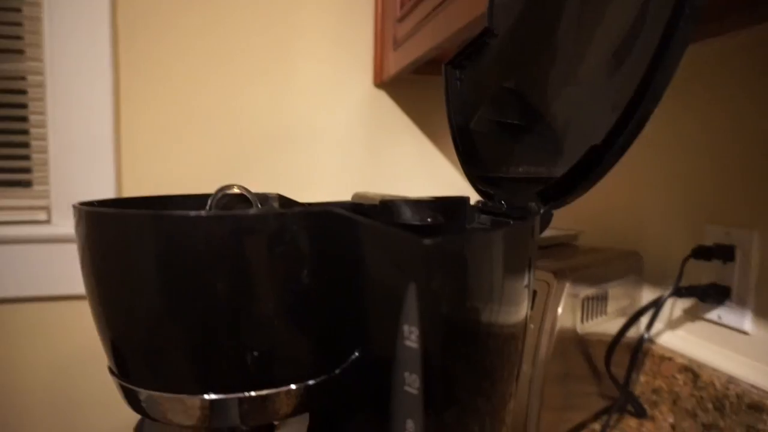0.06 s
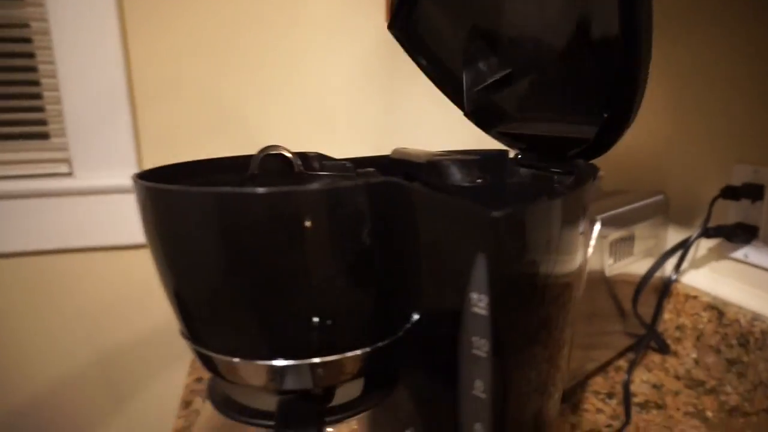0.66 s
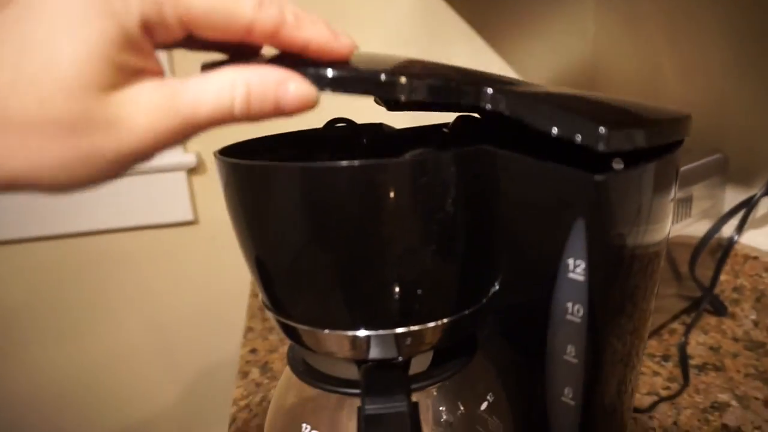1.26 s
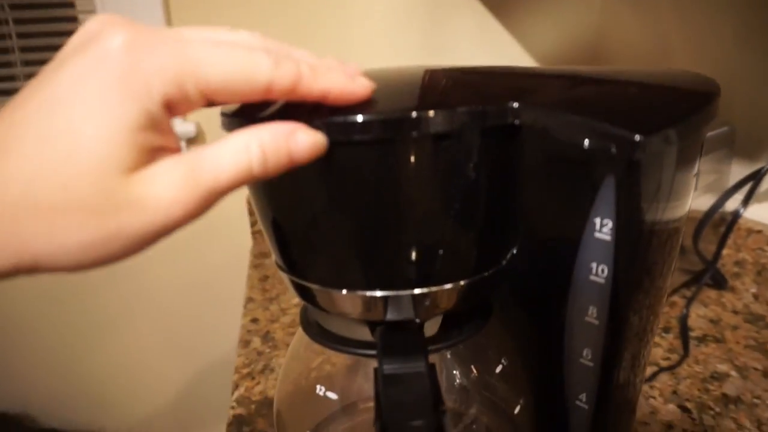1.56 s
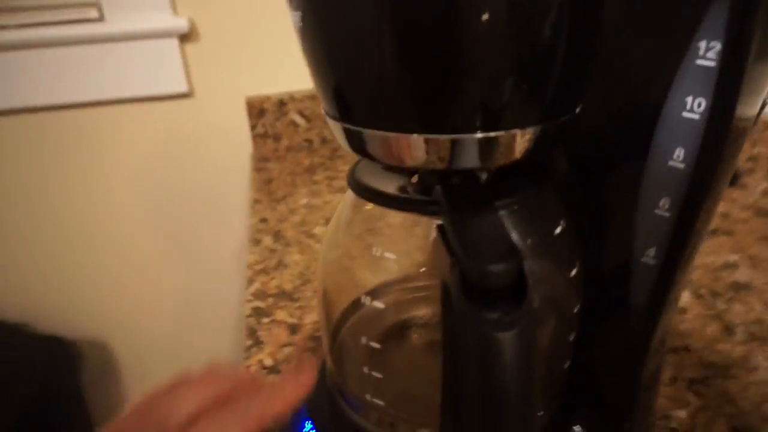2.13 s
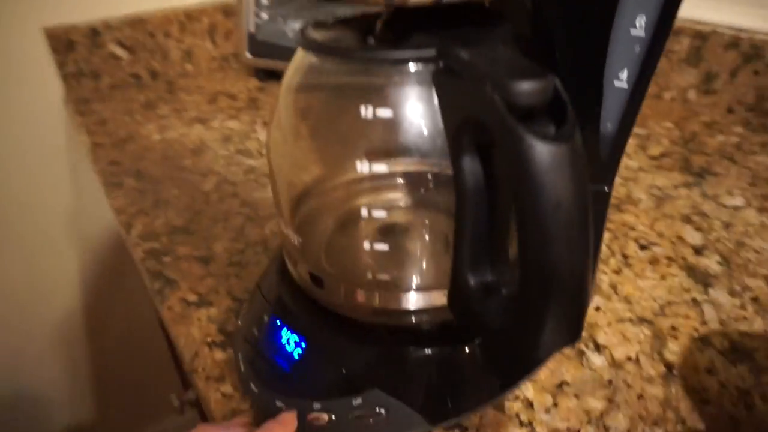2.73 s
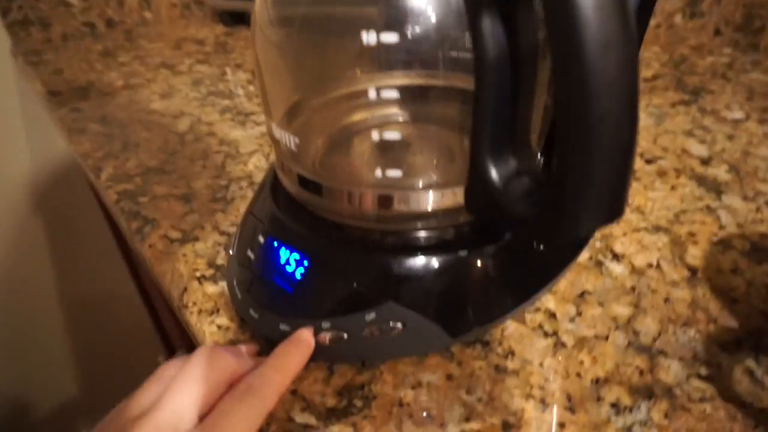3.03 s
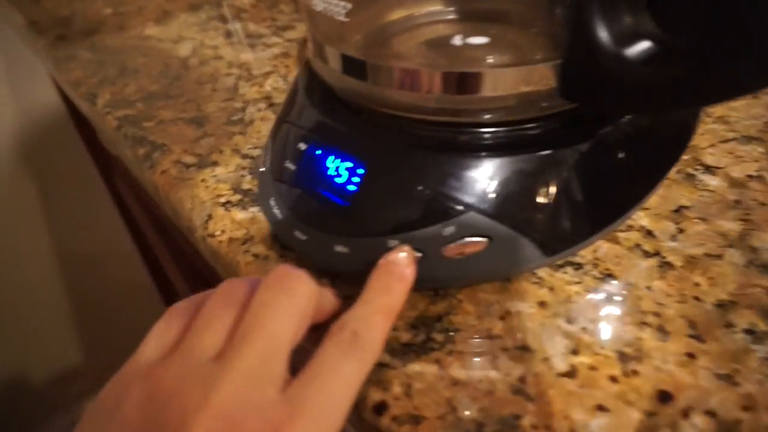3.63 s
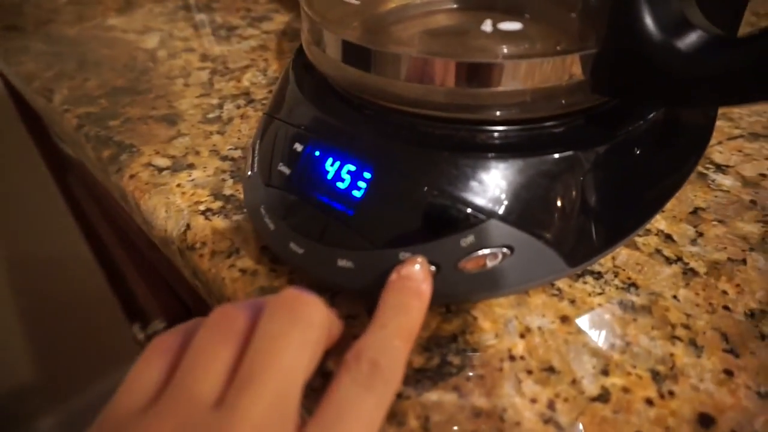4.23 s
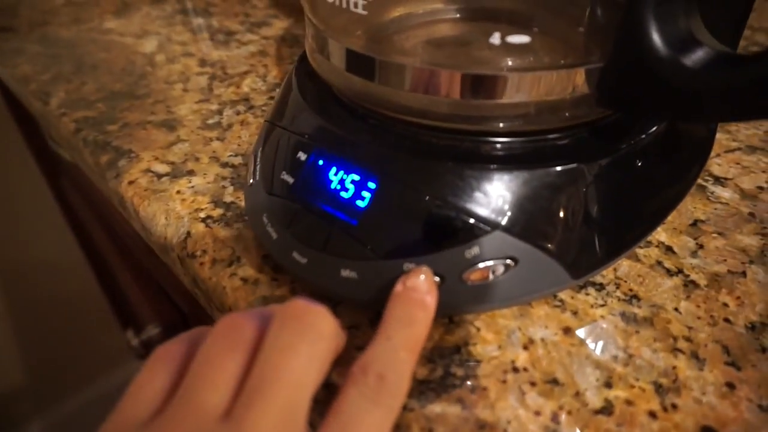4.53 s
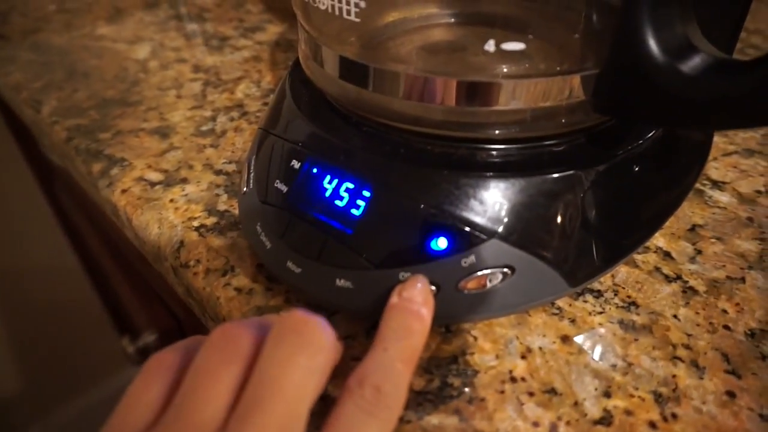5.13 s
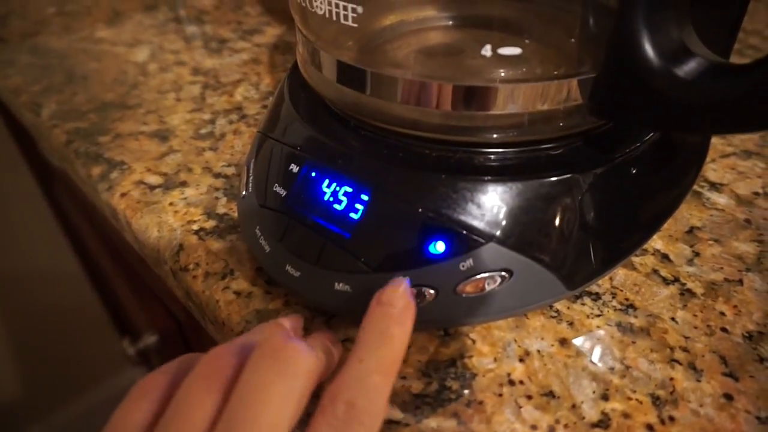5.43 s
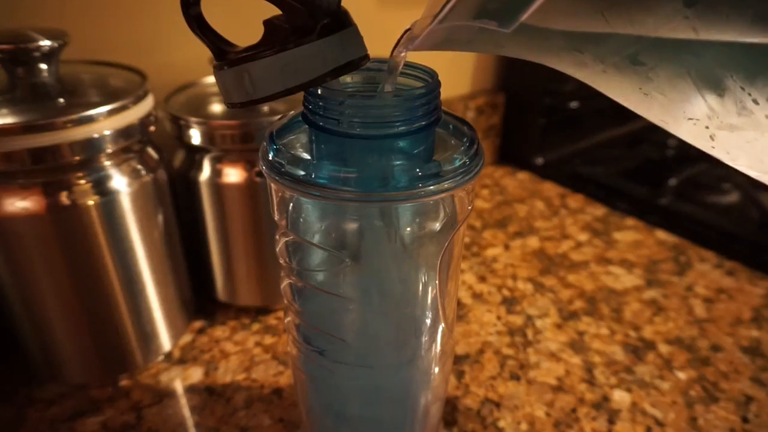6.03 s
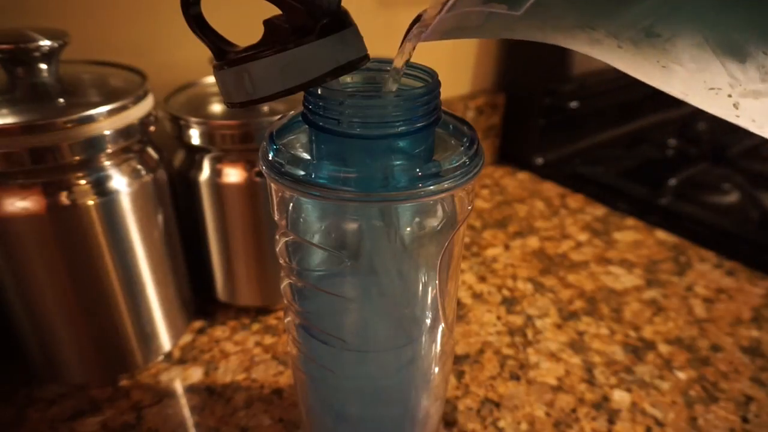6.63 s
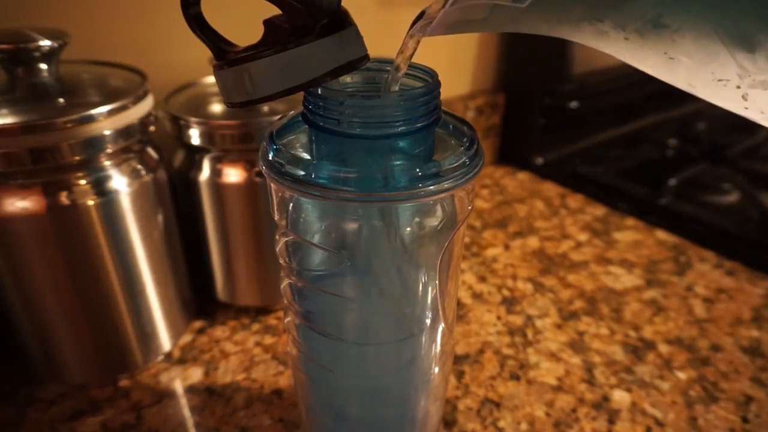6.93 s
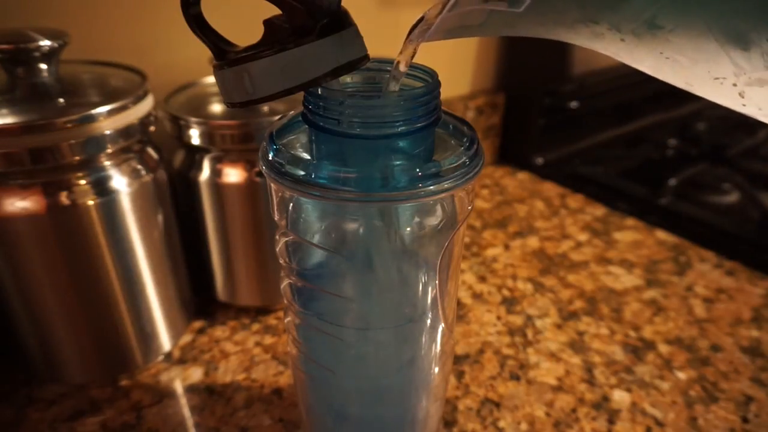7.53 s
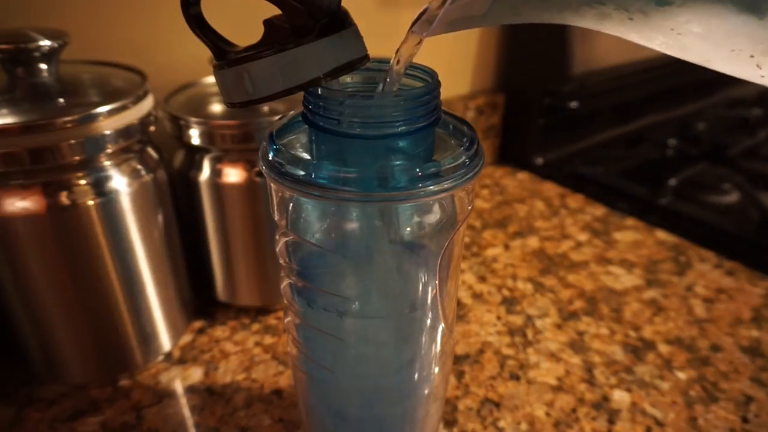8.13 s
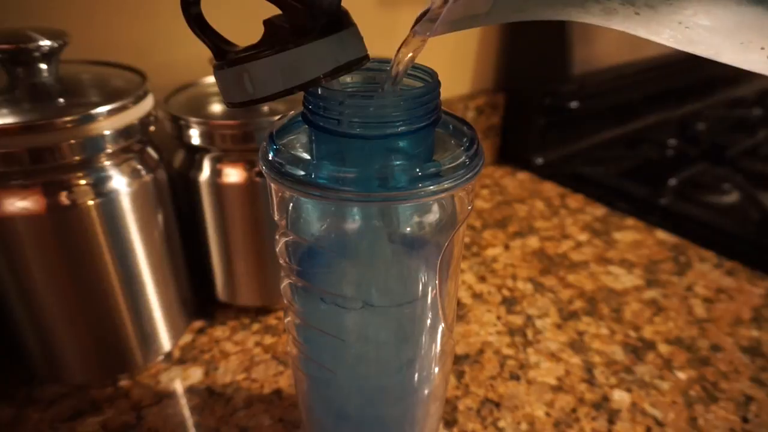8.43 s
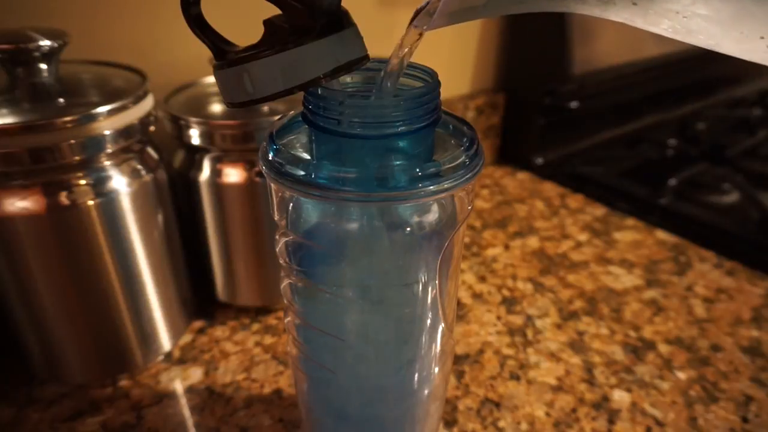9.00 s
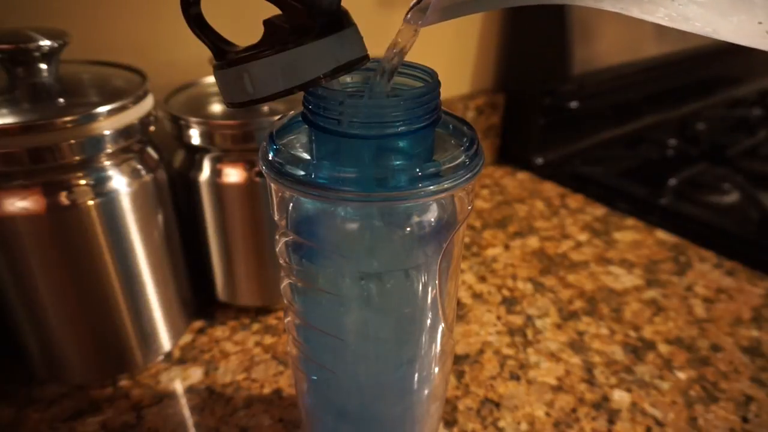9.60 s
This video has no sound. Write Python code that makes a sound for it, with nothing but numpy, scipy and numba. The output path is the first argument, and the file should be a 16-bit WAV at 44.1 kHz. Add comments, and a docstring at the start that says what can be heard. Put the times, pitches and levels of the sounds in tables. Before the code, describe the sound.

In a quiet home kitchen, a last bit of water splashes into a coffee maker. Its plastic lid rubs on a stiff hinge and shuts with hollow knocks. Dry handling crackles sound right at the microphone, then the power switch clicks. Water from a jug then pours into a plastic tumbler close by, spraying and bubbling, with deeper gulps as the pitch rises. An appliance hums faintly behind it all.

```python
"""Water from a jug fills a plastic tumbler close to the microphone in a home kitchen: drops spray, bubbles
ring, and the shrinking air space above the water rises in pitch. Before the pour, a mug's last water
splashes into a coffee maker on the counter, its plastic lid slips down on a stiff hinge and shuts,
handling noise crackles right at the microphone, and the power switch snaps.
An appliance hums faintly behind it all."""
import sys
import numpy as np
from scipy import signal
from scipy.fft import rfft, irfft, next_fast_len
from scipy.io import wavfile
from scipy.ndimage import uniform_filter1d
from numba import njit

SR = 44100
rng = np.random.default_rng(int(sys.argv[2]) if len(sys.argv) > 2 else 0)


def materialize(psi):
    """Save the field psi as 16-bit PCM at rate SR to the path in sys.argv[1].

    A 1-D psi becomes a single channel; in a 2-D psi each row is a channel.
    """
    bounded = np.clip(np.atleast_2d(psi).T, -1, 1)
    quanta = np.round(bounded * 32767).astype(np.int16)
    wavfile.write(sys.argv[1], SR, quanta)


N = 434826
TIME = np.arange(N) / SR


def undb(db):
    """Decibels to gain."""
    return 10 ** (np.asarray(db) / 20)


def curve(points, s):
    """Value at s seconds of a line through (seconds, value) points."""
    return np.interp(s, *np.transpose(points))


def unit(x):
    """Scale to rms 1."""
    return x / np.sqrt(np.mean(x ** 2) + 1e-20)


def blow(x):
    """Scale a transient to the energy of 5 ms at rms 1."""
    return x * np.sqrt(.005 * SR / np.mean(np.sum(x ** 2, axis=-1)))


def fade(t60, n):
    """Exponential decay by 60 dB in t60 seconds."""
    return np.exp(-np.log(1000) * np.arange(n) / SR / max(t60, 1e-3))


def add(out, s, x):
    """Mix x into out at s seconds."""
    i = max(int(s * SR), 0)
    out[..., i:i + x.shape[-1]] += x[..., :max(N - i, 0)]


def highpass(x, hz, order):
    """Roll off the bass below hz."""
    return signal.sosfilt(signal.butter(order, hz, "highpass", fs=SR, output="sos"), x)


def colour(x, spectrum):
    """Filter by (Hz, dB) points, falling steeply beyond both ends."""
    hz, db = np.transpose(spectrum)
    n = next_fast_len(x.shape[-1])
    f = np.fft.rfftfreq(n, 1 / SR) + 1
    gain = undb(np.interp(np.log(f), np.log(hz), db))
    skirts = np.minimum(f / hz[0], 1) ** 2 * np.minimum(hz[-1] / f, 1) ** 4
    return irfft(rfft(x, n) * gain * skirts, n)[..., :x.shape[-1]]


def even(x, span_s):
    """Hold the slow level at 1 and keep the fast grain."""
    power = np.mean(np.atleast_2d(x) ** 2, axis=0)
    size = max(int(span_s * SR / 2), 2)
    power = uniform_filter1d(uniform_filter1d(power, size), size)
    return x / np.sqrt(np.abs(power) + 1e-3 * power.mean())


def wander(per_s):
    """A slow random curve with a spread near 1."""
    knots = np.arange(0, N / SR + 1, 1 / per_s)
    return 1.2 * np.interp(TIME, knots, rng.standard_normal(len(knots)))


def follow(db, law):
    """Level of one part of a hit of strength db; law is (dB at a strength of -20.5 dB, dB per dB)."""
    return law[0] + law[1] * (db + 20.5)


def air(n):
    """Diffuse noise at the microphone's two close ports: alike in the bass, less so higher up."""
    mid, side = rng.standard_normal((2, n))
    side = colour(side, [(100, -25), (400, -7.5), (1000, -5.5), (2200, 0), (5000, -2), (12000, -6),
                         (20000, -12.5)])
    return np.array([mid + side, mid - side])


def burst(spectrum, t60, n):
    """Dense, quickly dying resonances; the contact takes half a millisecond to build."""
    return blow(colour(air(n), spectrum) * fade(t60, n) * (1 - fade(0.0037, n)))


def ring(modes, n, stretch=1):
    """Struck (Hz, dB, t60 s) modes, a little different at every blow; stretch scales their decay times."""
    t, out = np.arange(n) / SR, np.zeros(n)
    for hz, db, t60 in modes:
        strength, detune = rng.standard_normal(2)
        tone = np.sign(detune) * np.sin(2 * np.pi * hz * (1 + 0.0033 * detune) * t)
        out += undb(db + 2 * strength) * tone * fade(t60 * stretch, n)
    return blow(out)


def bubble(hz, cycles, glide, onset=1):
    """A pocket of air rings for some cycles, its pitch rising as it nears the surface."""
    age = np.arange(int(cycles * SR / hz) + 2) * hz / SR  # in cycles
    tone = np.sin(2 * np.pi * age * (1 + glide * age / cycles / 2))
    return tone * np.exp(-np.log(300) * age / cycles) * (1 - np.exp(-age / onset))


def swarm(start, end, per_s, lo_hz, hi_hz, cycles, spread_db):
    """Random bubbles: many faint ones, a few loud."""
    out = np.zeros(N)
    for when, pitch, size, life in rng.random((int(per_s * (end - start)), 4)):
        gain = undb(spread_db * min(-np.log(1 - size), 4))
        hz = lo_hz * (hi_hz / lo_hz) ** pitch
        add(out, start + when * (end - start), gain * bubble(hz, cycles * (.5 + life), glide=0.035))
    return out


def clicks(start, end, per_s, spread_db):
    """Bare impulses of unequal size at random times."""
    out = np.zeros(N)
    when, size, sign = rng.random((int(per_s * (end - start)), 3)).T
    at = np.clip((start + when * (end - start)) * SR, 0, N - 1).astype(int)
    out[at] = np.sign(sign - .5) * undb(spread_db * np.minimum(-np.log(1 - size), 4))
    return out


@njit
def resonate(x, hz, width_hz):
    """Band-pass whose centre and width move."""
    out, band_state, low_state = np.empty(len(x)), 0., 0.
    for i in range(len(x)):
        g, damping = np.tan(np.pi * hz[i] / SR), width_hz[i] / hz[i]
        band = (band_state + g * (x[i] + 1e-18 - low_state)) / (1 + g * (g + damping))
        band_state = 2 * band - band_state
        low_state += 2 * g * band
        out[i] = damping * band
    return out


# The kitchen's reverberation, heard at the counter. Each row: frequency in Hz, level in dB.
ROOM_COLOUR = [(100, -6.5), (300, 2), (1100, -0.5), (3000, 2.5), (8000, 0), (16000, -14)]
ROOM_T60_S, TREBLE_T60_S = 0.44, 0.49
def room(x, near_db, wet_db):
    """Direct sound, quick reflections from counter and wall, then the kitchen's tail."""
    n = SR // 2
    noise = colour(air(n), ROOM_COLOUR)
    low = signal.sosfilt(signal.butter(1, 2500, fs=SR, output="sos"), noise)
    tail = (low * fade(ROOM_T60_S, n) + (noise - low) * fade(TREBLE_T60_S, n)) * (1 - fade(0.015, n))
    near = air(n) * fade(0.034, n) * (1 - fade(0.0039, n))
    response = sum(undb(db) * r / np.sqrt(np.sum(r ** 2) / 2)
                   for r, db in ((near, near_db), (tail, wet_db)))
    return x + signal.fftconvolve(np.atleast_2d(x), response, axes=-1)[:, :x.shape[-1]]


# Room tone and hiss, all around the microphone. Each row: frequency in Hz, level in dB.
ROOM_TONE = [(40, -20.5), (150, -15.5), (330, -8), (550, -4), (800, -7), (1400, 1), (1800, -7),
             (2150, -0.5), (2900, -10), (6500, -12.5), (8000, -7.5), (10000, -16)]
HISS = [(9000, -25), (11500, -9), (13500, -13), (15000, -3), (16000, -19)]
def room_tone():
    """The kitchen's still air, with a thin hiss on top."""
    return undb(-60) * unit(colour(air(N), ROOM_TONE)) + undb(-65) * unit(colour(air(N), HISS))


# An appliance in the background, heard from three spots. Each row: frequency in Hz, then rms level in dB
# with the microphone beside the lid, on the way, and down by the switch.
HUM_LINES = [(2035, -86.5, -74, -65.5), (2154, -64.5, -75, -69), (14940, -74.5, -85, -70),
             (15061, -72, -79, -73)]
MIC_AT_SPOT_S = (2.6, 2.5, 5.1)
def appliance_hum():
    """Thin, slightly wavering tones whose levels depend on where the microphone is."""
    out, knots = np.zeros((2, N)), np.linspace(0, N / SR, 50)
    for hz, *spots_db in HUM_LINES:
        db = np.interp(TIME, MIC_AT_SPOT_S, spots_db)
        for channel in out:
            drift, sway = (np.interp(TIME, knots, k) for k in rng.standard_normal((2, len(knots))))
            channel += np.sqrt(2) * undb(db + 0.8 * sway) * np.sin(2 * np.pi * hz * TIME + 0.7 * drift)
    return out


def whirr(start=2.97, end=3.7, edge_s=0.047, hz=490, width_hz=113):
    """A faint, narrow band of noise comes and goes, perhaps a lens focusing."""
    running = np.clip(np.minimum(TIME - start, end - TIME) / edge_s, 0, 1)
    band = [(hz - width_hz, -18), (hz, 0), (hz + width_hz, -14)]
    return undb(-64) * unit(colour(air(N), band)) * running


# The ring of a crackle at the microphone. Each row: frequency in Hz, level in dB, t60 in seconds.
CRACKLE_MODES = [(1336, -2.5, 0.049), (2440, 0, 0.07), (3000, 6.5, 0.015)]
# Its body and its bright edge. Each row: frequency in Hz, level in dB.
CRACKLE_BODY = [(1100, -12), (1350, -6.5), (1900, -15), (2600, 18), (3400, -1.5), (5000, -6)]
CRACKLE_TOP = [(3500, -12.5), (5400, -3.5), (7500, -1.5), (10000, -15.5), (12000, -10), (16000, -29)]
GRIT_DB, GRIT_T60_S, RIGHT_PORT_LAG_S = -20, 0.15, 0.00021
def crackle(db):
    """A tiny double snap, mostly left: the contact sticks once more, lets go, and loose grains rattle."""
    out, n = np.zeros((2, SR // 10)), SR // 12
    pan_db = 3.4 + 1.5 * rng.standard_normal()
    for delay, share_db in ((0, -1.5), (rng.uniform(0.0012, 0.0039), -5)):
        shift = np.exp(0.081 * rng.standard_normal())  # each snap lets go at another spot
        modes = [(hz * shift ** .25, level, t60) for hz, level, t60 in CRACKLE_MODES]
        body = undb(-16) * np.array([ring(modes, n), ring(modes, n)]) * (1 - fade(0.0017, n))
        body += undb(-10.5) * burst([(hz * shift, level) for hz, level in CRACKLE_BODY], 0.0085, n)
        edge = undb(follow(db, (-38, 1.42))) * burst(CRACKLE_TOP, 0.0057, n)  # harder is brighter
        add(out, delay, undb(share_db) * (undb(db) * body + edge))
    grains = rng.standard_normal(n) ** 5 * fade(GRIT_T60_S, n)
    grit = colour(grains, [(1200, -5), (2800, 8.5), (6000, -14), (12000, -22.5)])
    add(out, 0, undb(db + GRIT_DB) * blow(grit))
    out = highpass(out, 950, order=3)
    out[1] = np.roll(out[1], int(RIGHT_PORT_LAG_S * SR))
    return out * undb([[pan_db / 2], [-pan_db / 2]])


# Dry crackles and dull bumps on the body that holds the microphone. Each row: start in seconds, level in dB.
CRACKLES = [(0.273, -21.5), (0.29, -26.5), (0.813, -24), (2.174, -12), (2.178, -7), (2.2306, -19),
            (2.2868, -13.5), (2.301, -16), (2.317, -31), (2.368, -28.5), (2.4021, -13), (2.449, -21.5),
            (2.465, -19.5), (2.4826, -12.5), (2.5124, -14.5), (2.574, -26), (2.6323, -21), (2.678, -17),
            (2.6939, -14.5), (2.723, -23), (2.761, -20.5), (2.804, -17.5), (2.8418, -25.5), (2.888, -20),
            (2.91, -25.5), (3.113, -30.5), (3.2297, -17), (3.3016, -23), (3.319, -28.5), (3.3916, -32)]
BUMPS = [(2.177, -14.5), (2.198, -28.5), (2.217, -26)]
# The tone of a bump. Each row: frequency in Hz, level in dB.
BUMP_COLOUR = [(120, -25), (260, 12), (450, 7), (700, 8), (1100, 9.5), (1600, 8.5)]
def handling_noise():
    """Snaps and bumps so near the microphone that the room hardly answers."""
    out = np.zeros((2, N))
    for s, db in CRACKLES:
        add(out, s, crackle(db))
    for s, db in BUMPS:
        add(out, s, undb(db) * burst(BUMP_COLOUR, 0.045, SR // 12))
    return room(out, near_db=-22, wet_db=-30)


# Press, latch and release, with the microphone down by the coffee maker's base.
# Each row: start in seconds, then the levels of body, button and snap in dB.
SWITCH_CLICKS = [(5.101, -26, -25, -29.5), (5.137, -29.5, -25.5, -24.5), (5.283, -19.5, -30.5, -32),
                 (5.3038, -33, -36, -40)]
# The tones of those three parts. Each row: frequency in Hz, level in dB.
SWITCH_BODY = [(330, -23.5), (600, -15), (750, -3.5), (1150, 0.5), (1400, 2.5), (1750, -8), (2000, -15)]
SWITCH_BUTTON = [(1700, -4), (2350, 8), (2700, -4.5), (3500, -12)]
SWITCH_SNAP = [(1760, -41), (3000, -14), (4930, 2), (5750, -9.5), (6760, 0.5), (7830, -8), (9330, 2.5),
               (10400, -23), (11500, -6), (16000, -21)]
# Soft fingertip bumps on the base. Each row: start in seconds, level in dB.
FINGER_BUMPS = [(3.178, -53.5), (5.019, -51.5), (5.217, -44.5), (5.355, -46)]
SPRING_S, SPRING_DB, SPRING_T60_S = 5.138, -19.5, 0.17
def power_switch():
    """A fingertip lands, button and latch snap in the plastic base, and the latch's spring sings on."""
    out, n = np.zeros((2, N)), SR // 4
    for s, body_db, button_db, snap_db in SWITCH_CLICKS:
        add(out, s, undb(body_db) * burst(SWITCH_BODY, 0.057, n))
        add(out, s, undb(button_db) * burst(SWITCH_BUTTON, 0.01, n))
        add(out, s, undb(snap_db) * burst(SWITCH_SNAP, 0.011, n))
    spring = [(6000, -14), (7000, -1), (10000, -4), (11500, 6), (14000, -1), (16000, -3)]
    add(out, SPRING_S, undb(SPRING_DB) * burst(spring, SPRING_T60_S, n))
    for s, db in FINGER_BUMPS:
        add(out, s, undb(db) * burst([(300, -11.5), (390, 2.5), (500, -12.5)], 0.25, n))
    return room(out, near_db=-1.5, wet_db=-3.5)


# The lid's hinge rubbing, near the microphone. Each row: start and end in seconds, level in dB.
RUBS = [(0.158, 0.277, -51.5), (0.526, 0.674, -41), (1.1, 1.28, -35.5), (1.362, 1.57, -37)]
# The tone of the rub. Each row: frequency in Hz, level in dB.
RUB_COLOUR = [(130, -32.5), (250, -11), (360, -1), (520, -5.5), (750, -16.5), (1300, -18.5), (2200, -30)]
def hinge_rub(edge_s=0.02):
    """Dense tiny catches of the hinge, heard through the hollow housing."""
    catches = room(clicks(0, N / SR, per_s=200, spread_db=0.5), near_db=-1, wet_db=-10.5)
    level = sum(undb(db) * np.clip(np.minimum(TIME - start, end - TIME) / edge_s, 0, 1)
                for start, end, db in RUBS)
    return even(colour(catches, RUB_COLOUR), 0.0494) * level


# The coffee maker's housing and panels. Each row: frequency in Hz, level in dB, unstretched t60 in seconds.
HOUSING_MODES = [(216.8, -7, 0.26), (256, -4, 0.25), (322, -0.5, .24), (415.8, -8, 0.28), (543, 4.5, 0.36),
                 (605, -7.5, 0.31), (739, -8.5, 0.2), (842, -2, 0.25), (881, -7, .3), (1053, 3.5, 0.53),
                 (1130, -11, .25), (1255, -8, .3)]
# The tones of a knock's thud, panels and edge. Each row: frequency in Hz, level in dB.
THUD_COLOUR = [(80, -44), (170, -24.5), (290, -8), (394, -0.5), (516, -6), (668, -16.5), (896, -17),
               (1190, -17.5), (1500, -25.5), (1950, -51)]
PANEL_COLOUR = [(500, -21), (650, 5.5), (850, 3.5), (1100, 5), (1400, -8.5), (2000, -18)]
TICK_COLOUR = [(880, -33), (1500, -2), (2440, -8), (2690, -5.5), (3090, -17), (5490, -23), (12600, -30.5),
               (16000, -20.5)]
def knock(db, ring_db, panel_law, tick_law):
    """One knock on the coffee maker: the hollow housing thuds, its panels ring, the edges tick."""
    n = SR // 4
    hollow_modes = [mode for mode in HOUSING_MODES if mode[0] < 750]
    panel_modes = [mode for mode in HOUSING_MODES if mode[0] >= 750]
    thud = undb(-7) * burst(THUD_COLOUR, 0.025, n) + undb(ring_db) * ring(hollow_modes, n, stretch=0.6)
    thud *= 1 - fade(0.012, n)
    panel = undb(-3.5) * burst(PANEL_COLOUR, 0.03, n) + undb(-8) * ring(panel_modes, n, stretch=0.45)
    tick = burst(TICK_COLOUR, 0.05, n)
    hit = undb(db) * thud + undb(follow(db, panel_law)) * panel + undb(follow(db, tick_law)) * tick
    return highpass(hit, 120, order=2)


# Hinge slips and landings, with the microphone beside the lid. Each row: start in seconds, thud level in dB.
SLIPS = [(0.598, -26.5), (1.085, -16), (1.124, -17), (1.176, -10.5), (1.389, -13), (1.471, -14.5),
         (1.815, -35)]
LANDINGS = [(1.553, -5.5), (1.569, -14), (1.608, -16.5), (2.008, -28.5), (2.025, -19.5), (2.035, -20.5)]
RIM_S, RIM_DB = 2.0185, -27  # the rim ticks as the fingers leave it
def lid():
    """The stiff hinge rubs and slips; the lid lands, rings the housing harder, bounces and settles."""
    out = hinge_rub()
    for s, db in SLIPS:
        add(out, s, knock(db, ring_db=-21.5, panel_law=(-39, .6), tick_law=(-44, .65)))
    for s, db in LANDINGS:
        add(out, s, knock(db, ring_db=-7, panel_law=(-20.5, 1.08), tick_law=(-37.5, 1)))
    add(out, RIM_S, undb(RIM_DB) * burst([(6000, -10), (12000, 3), (15000, 7.5)], 0.011, SR // 4))
    return room(out, near_db=-16.5, wet_db=-2.5)


# Slops into the reservoir, heard from beside the open lid.
# Each row: start in seconds, splash level in dB, gulp level in dB, gulp pitch in Hz.
SLOPS = [(0.014, -33, -24, 493), (0.024, -28, -18, 1240), (0.093, -40, -15, 484)]
# The tone of the splash. Each row: frequency in Hz, level in dB.
SPLASH_COLOUR = [(200, -19), (330, -12.5), (480, -2.5), (650, -12.5), (900, -8), (1300, 2), (1900, -9),
                 (3600, -24), (5500, -14.5), (7200, -22.5), (10500, -12.5), (16000, -19)]
MUG_DB, MUG_STOP_S, MUG_RELEASE_S, SLOP_T60_S = -24.5, 0.1016, 0.013, 0.088
def mug_splash():
    """The mug's last water swells with each slop, gulps air and stops abruptly."""
    grains = swarm(0, .13, per_s=3300, lo_hz=325, hi_hz=15600, cycles=4.2, spread_db=4.5)
    water = room(np.diff(grains, prepend=0) + 0.11 * grains, near_db=5, wet_db=-5)
    level, gulp = np.full(N, undb(MUG_DB)), np.zeros(N)
    for s, splash_db, gulp_db, hz in SLOPS:
        add(level, s, undb(splash_db) * fade(SLOP_T60_S, SR // 4))
        add(gulp, s, undb(gulp_db) * blow(bubble(hz, cycles=18, glide=.05, onset=1.8)))
    attack = np.clip(TIME / SLOPS[0][0], .3, 1)
    release = np.clip(1 - (TIME - MUG_STOP_S) / MUG_RELEASE_S, 0, 1) ** 2
    return (even(colour(water, SPLASH_COLOUR), 0.013) * level + gulp) * attack * release


POUR_S, FILL_S = 6.02, 6.48  # start of the pour; time it would take to reach the brim
STREAM_SPAN_S = (POUR_S - .02, N / SR)
POUR_AGE_S = np.maximum(TIME - POUR_S, 0)
PLUNGE_S, PLUNGE_RISE_S = 8.52, 0.13
def plunge(s, before_db, after_db):
    """A level that changes smoothly as the stream begins to drag air deep under."""
    return before_db + (after_db - before_db) * (1 + np.tanh((s - PLUNGE_S) / PLUNGE_RISE_S / 2)) / 2


def low_rumble():
    """A very faint, uneven low rumble during the pour."""
    impulses = clicks(*STREAM_SPAN_S, per_s=200, spread_db=3.5)
    return undb(-54) * even(colour(impulses, [(28, 16), (60, 3), (130, -19), (250, -31)]), 0.25)


EMPTY_HZ, WIDTH_HZ, FROTH_HZ_PER_S = 441.9, 4.6, 3.9
def air_note(s):
    """Pitch and width in Hz of the tumbler's air space: it rings like a bottle, and froth damps it."""
    air_left = np.clip(1 - (s - POUR_S) / FILL_S, .1, 1)
    return EMPTY_HZ / np.sqrt(air_left), WIDTH_HZ + FROTH_HZ_PER_S * np.maximum(s - POUR_S, 0)


def air_ring(s, detune=0):
    """The air space, pushed once: its note swells and dies, sooner as froth builds up."""
    n = SR // 3
    t = np.arange(n) / SR
    hz, width_hz = air_note(s)
    return np.sin(2 * np.pi * hz * (1 + detune) * t) * np.exp(-np.pi * width_hz * t) * (1 - fade(0.022, n))


def air_space():
    """Bubbles keep the shrinking air space above the water ringing, ever higher."""
    stir = swarm(*STREAM_SPAN_S, per_s=400, lo_hz=410, hi_hz=802, cycles=5.8, spread_db=3.5)
    note = resonate(np.diff(stir, prepend=0), *air_note(TIME))
    return even(room(note, near_db=-10, wet_db=-9), 0.1) * undb(plunge(TIME, -50, -35))


# Churning deep in the tumbler, late in the pour. Each row: time in seconds, level in dB.
CHURN_LEVEL = [(8.8, -74), (9.0, -48), (9.25, -43.5), (9.65, -41.5), (9.86, -58)]
# Its tone. Each row: frequency in Hz, level in dB.
CHURN_COLOUR = [(120, -2.5), (230, 4.5), (350, 8)]
def churn():
    """The deepening water turns over with a low rumble."""
    return even(colour(air(N), CHURN_COLOUR), 0.11) * undb(curve(CHURN_LEVEL, TIME))


# Gurgling, heard from outside the tumbler. Each row: frequency in Hz, level in dB.
GURGLE_COLOUR = [(240, -16.5), (380, -14), (560, -10), (850, -2), (980, -9.5), (1120, -2), (1250, -8.5),
                 (1400, -5.5), (1700, -23)]
def gurgle():
    """Low bubbles ring under the stream, louder once it plunges deep."""
    bubbles = swarm(*STREAM_SPAN_S, per_s=300, lo_hz=280, hi_hz=1650, cycles=11, spread_db=4)
    water = room(colour(np.diff(bubbles, prepend=0), GURGLE_COLOUR), near_db=3, wet_db=2)
    return even(water, 0.28) * undb(plunge(TIME, -40, -32.5))


# Fizz in the tumbler. Each row: frequency in Hz, level in dB.
FIZZ_COLOUR = [(820, -18), (1400, -4), (1560, -20.5), (1700, -13), (1830, -3), (1950, -4.5), (2220, -2.5),
               (2620, 0), (3100, -6.5), (3550, -6.5), (3800, 0), (4940, -24), (8360, -120)]
FIZZ_DB, SHALLOW_DB, SHALLOW_S = -34, 5.5, 0.59
def fizz():
    """Small bubbles, loudest while the water is shallow, come in clusters as the stream wobbles."""
    bubbles = swarm(*STREAM_SPAN_S, per_s=280, lo_hz=1450, hi_hz=3400, cycles=28, spread_db=3.8)
    db = FIZZ_DB + SHALLOW_DB * np.exp(-POUR_AGE_S / SHALLOW_S) + 1.97 * wander(per_s=9)
    return even(room(colour(bubbles, FIZZ_COLOUR), near_db=-3, wet_db=-3.5), 1.0) * undb(db)


def smack(hz):
    """One drop: a short wet tick and a dimple that rings around its own pitch."""
    n = SR // 20
    tick = burst([(3000, -8), (8500, 2), (16000, 3)], 0.012, n)
    dimple = burst([(.75 * hz, -20), (hz, 0), (1.25 * hz, -20)], 0.023, n)
    return tick + undb(3) * dimple


def shifting_room(x, near_db, wet_db):
    """Reflections keep changing as the water rises: a new set fades in every quarter second."""
    out, hop = np.zeros((2, N)), SR // 4
    window = np.sin(np.pi * np.arange(2 * hop) / (2 * hop))
    x = np.pad(x, ((0, 0), (0, 2 * hop)))
    for i in range(0, N, hop):
        if i + 2 * hop > POUR_S * SR:
            piece = np.pad(x[:, i:i + 2 * hop] * window, ((0, 0), (0, hop)))
            add(out, i / SR, room(piece, near_db, wet_db))
    return out


def mist():
    """Tiny ringing bubbles and the smacks of droplets of many sizes."""
    bubbles = swarm(*STREAM_SPAN_S, per_s=1400, lo_hz=3300, hi_hz=16000, cycles=36, spread_db=4)
    drops = sum(signal.oaconvolve(clicks(*STREAM_SPAN_S, per_s=40, spread_db=5.5), smack(hz)[0])[:N]
                for hz in np.geomspace(4600, 14000, 12))
    return unit(np.diff(bubbles, prepend=0)) + undb(4) * unit(drops)


# Spray at the tumbler's mouth, close to the microphone. Each row: frequency in Hz, level in dB.
SPRAY_COLOUR = [(1760, 9), (3000, -3), (3310, -0.5), (3570, -8), (4000, -1), (4540, 0), (4900, -4.5),
                (5330, -3), (6440, -2.5), (7100, -6), (8520, -1), (9600, -3.5), (13200, -2), (15100, -2),
                (16000, -29)]
SPRAY_DB, SPRAY_DB_PER_S = -33, 0.57
def spray():
    """Droplets land in clusters all around the tumbler's mouth, slowly growing louder."""
    wide = mist() + undb(-11) * mist() * np.array([[1], [-1]])
    reflected = shifting_room(colour(wide, SPRAY_COLOUR), near_db=3, wet_db=-27)
    return even(reflected, 0.28) * undb(SPRAY_DB + SPRAY_DB_PER_S * POUR_AGE_S + 1.5 * wander(per_s=9))


# Single bubbles that stand out at close range. Each row: start in seconds, strength in dB, pitch in Hz.
BUBBLES = [(5.939, -27.5, 2330), (6.0373, -16, 1880), (6.076, -11, 1857), (6.1059, -11.5, 1920),
           (6.1576, -13.5, 2750), (6.2326, -14, 1946), (6.4874, -17, 1930), (6.6416, -14.5, 2260),
           (6.6824, -18, 2270), (6.78, -15.5, 1945), (6.913, -19, 2000), (7.1344, -15, 2040),
           (8.0565, -15.5, 2280), (8.1964, -18.5, 2720), (8.392, -20.5, 2530), (8.464, -15.5, 2020),
           (8.522, -17.5, 3720), (9.0786, -20.5, 2630)]
# The loudest drops against the tumbler's wall. Each row: start in seconds, level in dB, pitch in Hz.
DROPS = [(6.025, -26, 5000), (6.2088, -28, 12900), (6.8773, -22, 10200), (6.949, -26, 4900),
         (7.3487, -31.5, 7820), (7.5036, -22.5, 12500), (7.5288, -25.5, 7700), (7.6512, -24, 11600),
         (8.27, -27, 9000), (8.3498, -28, 9200), (8.522, -23.5, 5000), (9.104, -22, 11600),
         (9.2167, -21.5, 12900), (9.4965, -24.5, 13300), (9.7318, -27, 13400)]
# The ring of the plastic tumbler. Each row: frequency in Hz, level in dB, t60 in seconds.
TUMBLER_MODES = [(1846, -1.5, 0.081), (1960, 8, 0.023), (2310, 2.5, 0.014), (2550, -1, 0.1),
                 (2510, 7.5, 0.0096), (2980, 0.5, 0.06), (3703, 6, 0.021), (4630, 0.5, 0.014)]
def plinks():
    """Each bubble's birth clicks against the tumbler, harder for strong ones; big drops burst into spray."""
    out, n = np.zeros((2, N)), SR // 12
    for s, db, hz in BUBBLES:
        wall = np.array([ring(TUMBLER_MODES, n), ring(TUMBLER_MODES, n)])
        click = wall + undb(-7) * burst(SPRAY_COLOUR, 0.039, n)
        add(out, s, undb(db - 5) * blow(bubble(hz, cycles=55, glide=0.02)))
        add(out, s, undb(follow(db, (-34, 1.58))) * click)
    for s, db, hz in DROPS:
        add(out, s, undb(db) * smack(hz))
        add(out, s, undb(db - 16) * burst(SPRAY_COLOUR, 0.18, n))
    out = highpass(out, 900, order=2)  # such small sources radiate no bass
    return room(out, near_db=-9, wet_db=-8)


# Gulps in the tumbler, close and fairly dry.
# Each row: start in seconds, bubble level in dB, its pitch in Hz, level of the air space in dB.
GULPS = [(6.142, -35, 1130, -38.5), (6.172, -41, 800, -33), (7.29, -30, 864, -31.5),
         (7.862, -25, 1395, -48), (8.107, -22, 1360, -49), (8.163, -27, 1110, -31),
         (8.342, -22, 875, -25.5), (8.457, -23.5, 1390, -52), (8.633, -16.5, 873, -18),
         (8.971, -16.5, 662, -19), (9.104, -13, 637, -10.5), (9.235, -17.5, 650, -15),
         (9.306, -19, 684, -11), (9.342, -23, 632, -11), (9.463, -19, 708, -8.5), (9.59, -17.5, 652, -13),
         (9.612, -11.5, 650, -14), (9.66, -15, 688, -15), (9.808, -18, 718, -36)]
# The froth after a gulp. Each row: frequency as a multiple of the gulp's pitch, level in dB.
FROTH_COLOUR = [(.7, -10), (1.1, -2.5), (1.6, -9), (2.3, -22)]
def gulps():
    """Large pockets of air plop at their own pitch, break up into froth and set the air space ringing."""
    out, n = np.zeros((2, N)), SR // 3
    for s, db, hz, air_db in GULPS:
        froth = [(multiple * hz, level) for multiple, level in FROTH_COLOUR]
        add(out, s, undb(db) * blow(bubble(hz, cycles=24.3, glide=0.032, onset=2.4)))
        add(out, s, undb(db - 10.5) * burst(froth, 0.19, n))
        add(out, s, undb(air_db) * air_ring(s))
    return room(out, near_db=-11, wet_db=-13)


def glugs(flow, gap_s=(.04, .095)):
    """Small pockets of air go under at uneven intervals; each rings the air space a little off its note."""
    out = np.zeros((2, N))
    times = POUR_S + .1 + np.cumsum(rng.uniform(*gap_s, size=150))
    for s in times[times < N / SR]:
        strength, detune = rng.standard_normal(2)
        db = plunge(s, -45.5, -19) + curve(flow, s) + 3 * min(strength, 1)
        add(out, s, undb(db) * air_ring(s, .028 * detune))
    return room(out, near_db=-15, wet_db=-16)


# The jug's stream, close and a touch left; it thins briefly. Each row: time in seconds, strength in dB.
FLOW = [(6.0, -2.5), (6.9, 2), (7.03, -2), (7.15, 0), (7.85, 0.5), (8.0, -9), (8.1, 0.5), (9.86, 1)]
def pour():
    """The stream sprays on impact and drags air under as the tumbler fills at a steady rate."""
    flowing = np.clip((TIME - STREAM_SPAN_S[0]) / 0.057, 0, 1) * undb(curve(FLOW, TIME))
    pooled = np.clip(POUR_AGE_S / 0.12, 0, 1)  # the low sounds need a pool of water first
    high = (spray() + fizz()) * flowing
    low = (gurgle() + air_space() + churn() + low_rumble()) * pooled
    return (high + low) * undb([[.6], [-.6]]) + plinks() + gulps() + glugs(FLOW)


def scene():
    """The coffee maker, then the pour, over the kitchen's quiet background."""
    foreground = mug_splash() + lid() + handling_noise() + power_switch() + pour()
    return foreground + whirr() + room_tone() + appliance_hum()


def record(dry):
    """The microphone chain thins the bass, cannot pass full scale and cuts the top."""
    thin = highpass(dry, 135, order=3)
    top_cut = signal.ellip(10, .2, 80, 15900, fs=SR, output="sos")
    return signal.sosfilt(top_cut, np.clip(thin, -1, 1))


dry = scene()
out = record(dry)
materialize(out)
```